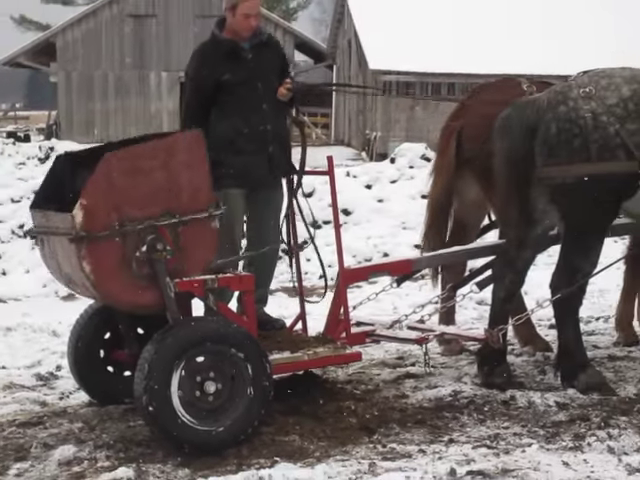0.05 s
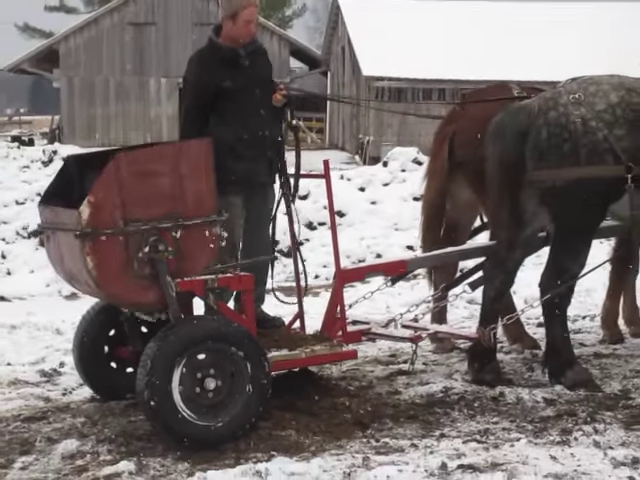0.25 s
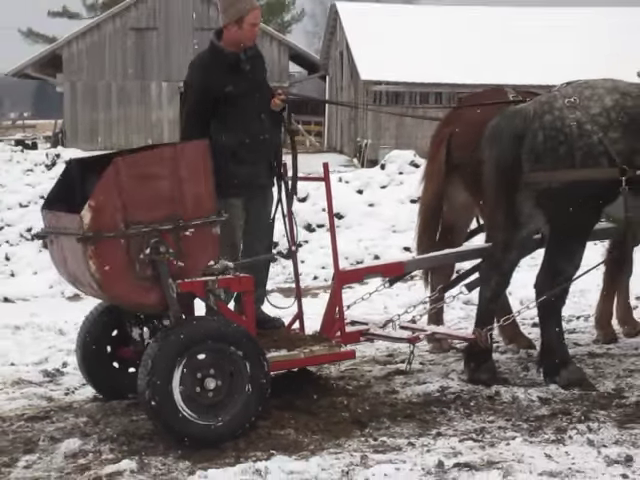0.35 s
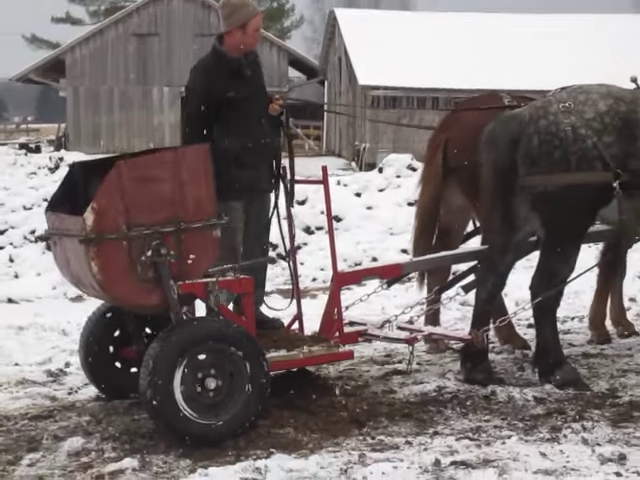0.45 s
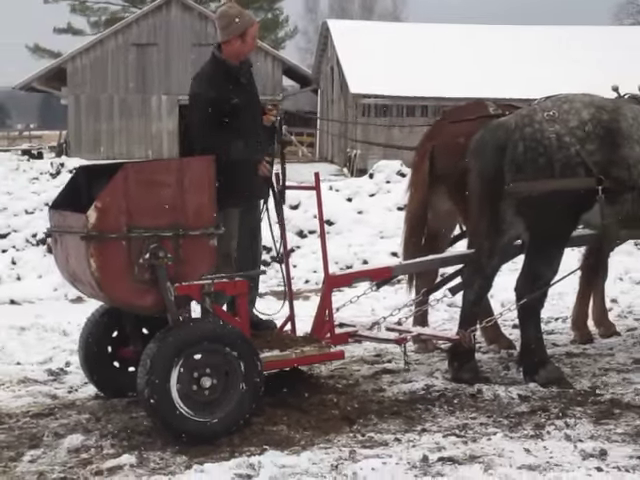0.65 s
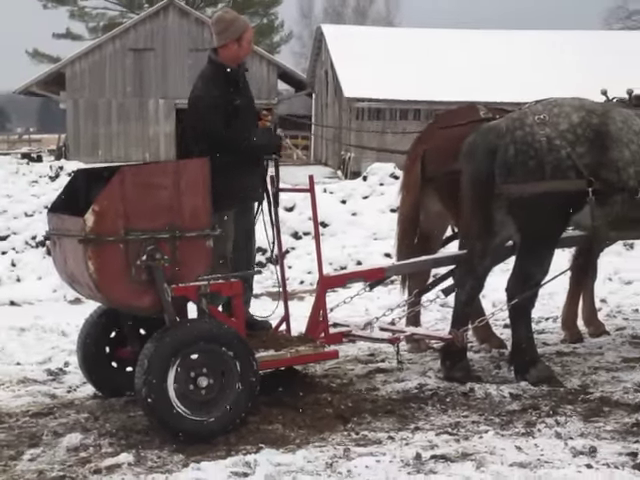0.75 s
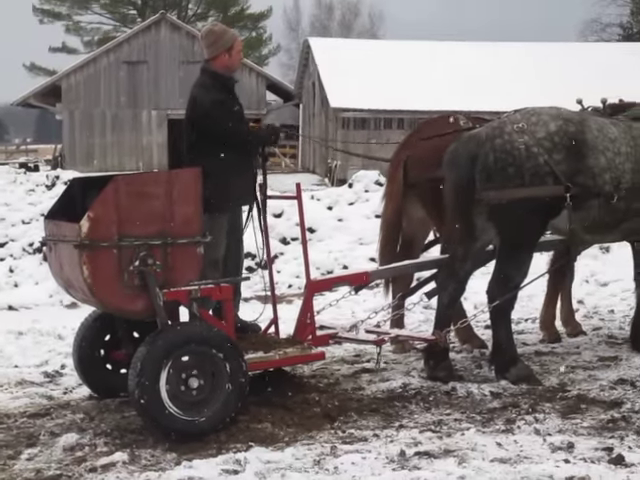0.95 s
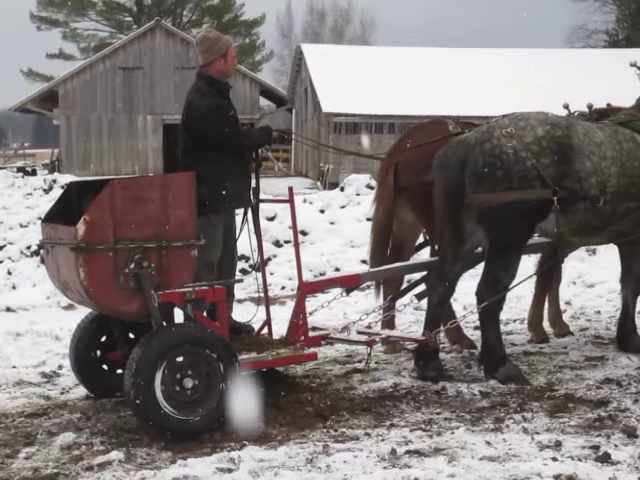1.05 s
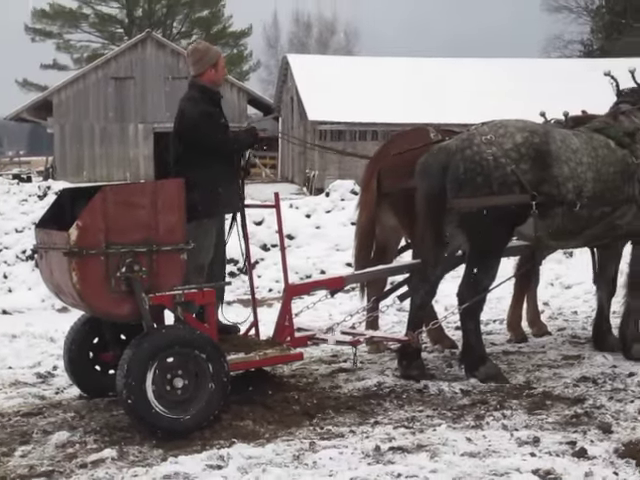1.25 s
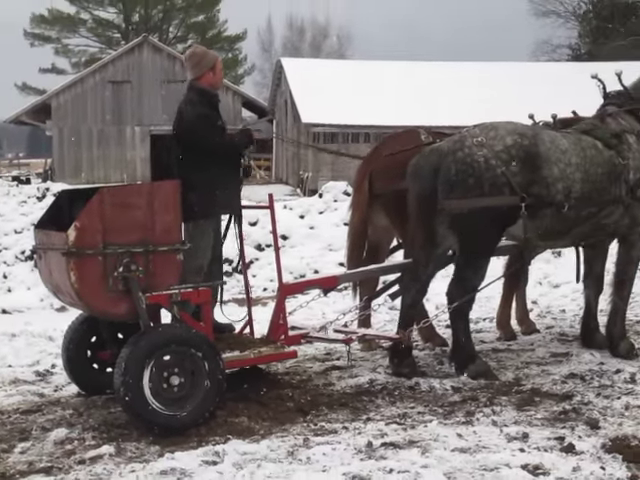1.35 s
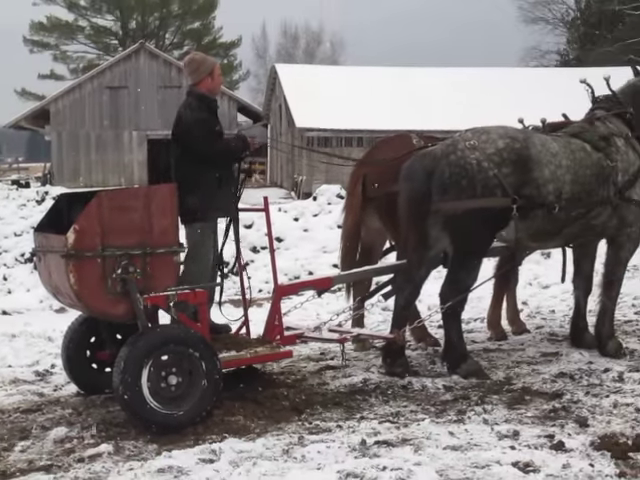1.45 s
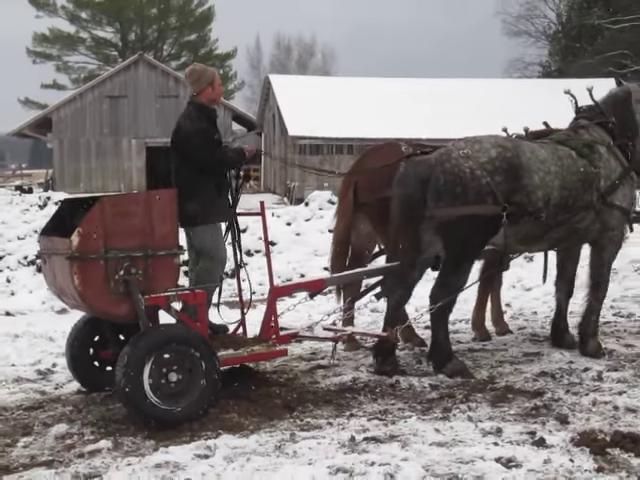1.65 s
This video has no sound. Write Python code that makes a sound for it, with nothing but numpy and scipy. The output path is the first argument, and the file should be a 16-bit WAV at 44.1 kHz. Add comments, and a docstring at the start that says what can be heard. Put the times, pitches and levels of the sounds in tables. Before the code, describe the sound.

Sharp knocks and low clunks from a cart starting to roll, over faint wind.

```python
"""A horse-drawn cart of wood and steel jolts into motion on a farm track, close by.
Impacts in its slack joints excite the damped modes of body, frame and hitch, and the hopper answers with
low clunks. The rolling wheels force hopper, panels and boards into vibration and crush grit; trace chains
clink, and friction makes a joint squeak twice. Faint wind lies behind. An automatic gain control lowers
the level at the loudest knock and recovers slowly."""
import sys
import numpy as np
from scipy import signal
from scipy.fft import rfft, irfft
from scipy.io import wavfile
from scipy.ndimage import uniform_filter1d

SR = 44100
rng = np.random.default_rng(int(sys.argv[2]) if len(sys.argv) > 2 else 0)


def generate_wav(signal):
    """Clip the signal to [-1, 1] and save it as 16-bit WAV at the path in sys.argv[1]."""
    frames = np.transpose(np.atleast_2d(signal))
    scaled = np.clip(frames, -1, 1) * 32767
    pcm = np.round(scaled).astype(np.int16)
    wavfile.write(sys.argv[1], SR, pcm)


N = 74970
T = np.arange(N) / SR

# Impacts in the joints. Each row: start in seconds, levels of wood, steel, hitch and crack in dB,
# chatter time in seconds, spectral tilts of wood and steel in dB per octave.
IMPACTS = [(.2249, 3.5, -1, -13, -3.5, 0.0038, -1.5, 3.5),
           (0.722, -5.5, -5.5, -23, -16.5, 0.0017, -3.5, -1),
           (0.727, -8.5, -12, -24, -17.5, 0.0039, 3.5, -3),
           (.8094, -36.5, -42.5, -52, -34.5, 0.0036, -15, 8), (0.9371, -12, -6.5, -9, -17, 0.0069, -10, -4),
           (1.0534, -22, -17, -22.5, -31, 0.0022, -13.5, 0.5),
           (1.1191, -23, -15.5, -20, -26.5, 0.0061, 9, -3.5),
           (1.195, -26, -28.5, -26, -43.5, 0.0047, -2, -2.5),
           (1.321, -25.5, -25, -27, -40, 0.0015, -1, -5.5), (1.390, -30, -28.5, -31, -51, 0.011, -6.5, -12)]
# Normal modes. Each row: frequency in Hz, relative level in dB, time to decay by 60 dB in seconds.
WOOD_MODES = [(345, -19, .45), (474, -11, .2), (518, -1, .18), (560, -8, .1), (604, -5, .27),
              (646, -14, .3), (714, -7, .18), (813, -20, .22)]
STEEL_MODES = [(1116, -7, 0.3), (1281, 2.5, 0.15), (1362, -26, 0.04), (1636, -6, 0.24), (2005, -19, 0.36),
               (2297, -22, .12), (2446, -1, 0.073), (2713, 3, 0.032), (2998, -7.5, 0.23),
               (3125, -16.5, 0.32), (3114, -4.5, 0.15)]
HITCH_MODES = [(1630, -6, .16), (1722, -6, .14), (1755, 0, .17), (1795, -7, .15), (2255, -10, .14),
               (2445, -7, .15)]
LINK_MODES = [(3760, -9.5, .04), (5200, -9.5, .05), (5950, 5, 0.032), (6970, -1, .07), (6720, -20, 0.028),
              (7240, 0.5, 0.11), (8840, -0.5, .04)]
# Noise spectra. Each row: frequency in Hz, relative spectral density in dB.
WIND_SPECTRUM = [(25, 8), (90, 6), (200, 3), (350, -2), (900, -3.5), (1600, -8.5), (2700, -14.5),
                 (4400, -27.5), (6600, -22), (9000, -37.5), (11500, -40), (15000, -40.5)]
WOOD_SPECTRUM = [(100, -3.5), (170, -5), (300, -20), (430, -9.5), (520, 4), (620, 8.5), (730, 1),
                 (900, -14), (1200, -63.5), (3000, -82.5)]  # overlapping modes of the body
STEEL_SPECTRUM = [(600, -16), (950, 5), (1700, 9), (2050, 3), (2600, 0.5), (3200, -1.5), (3550, -16),
                  (4200, -37.5), (9000, -80.5)]  # overlapping modes of the frame
CRACK_SPECTRUM = [(2500, -35), (3600, 11.5), (4300, -6), (5800, 0.5), (7500, -6), (8600, -18), (10300, -17),
                  (12000, -40.5)]
STRIKE_SPECTRUM = [(200, -16.5), (500, 12.5), (900, -5.5), (1300, 0), (2000, -9), (2700, 17), (3300, 6),
                   (4100, -18.5), (7500, -14.5), (10000, -36), (12000, -42.5), (15500, -44)]  # the first hard contact of a blow
GRIT_SPECTRUM = [(500, 0.5), (900, 4.5), (1800, -5), (3100, -13.5), (4000, -34.5), (7000, -35),
                 (10000, -67)]
# Jolts of the hopper. Each row: start in seconds, frequency in Hz, level in dB.
HOPPER_JOLTS = [(0.225, 110.7, 2), (.365, 115.5, -12), (.724, 110.8, -7.5), (0.813, 92, -10),
                (0.933, 106.3, -10.5), (1.04, 106.9, -14), (1.081, 102.8, -7.5), (1.228, 107.6, -17),
                (1.313, 99, -18)]
# Course of the rolling. Each row: time in seconds, levels of drone, rumble, rattle and grit in dB.
ROLLING_LEVELS = [(0.221, -62, -104, -76, -98), (0.262, -19, -22, -18, -21.5),
                  (0.361, -13.5, -12.5, -20, -41), (.47, -20.5, -16, -29.5, -39),
                  (0.601, -22, -22, -33.5, -36.5), (0.721, -22, -23, -33.5, -36.5),
                  (0.898, -31, -27, -33.5, -45), (1.02, -21.5, -30.5, -28.5, -39),
                  (1.121, -33.5, -32, -20, -36), (1.251, -25, -31, -31.5, -39.5),
                  (1.399, -36, -37, -35, -51.5), (1.5, -38.5, -44, -49, -51.5),
                  (1.571, -29, -53, -49, -54.5), (1.65, -33.5, -48, -57, -57),
                  (1.7, -36.5, -50.5, -52, -63)]
# Resonances driven by rolling. Each row: frequency in Hz, half-width in Hz, relative level in dB.
PANEL_RESONANCES = [(59.5, 18, 0), (86, 42, -9.5), (146, 22, 1.5), (162, 11, -9.5), (210, 8, 1.5),
                    (239, 27, -14), (281, 18, -2.5), (344.5, 7.8, 8), (394, 10, -22), (407, 20, 1)]
BOARD_RESONANCES = [(543, 41, -0.5), (540, 32, -13.5), (608.4, 6, 9), (640.6, 12, -7.5), (657, 17, -4),
                    (778, 26, -7)]
# Contacts in the trace chains. Each row: start in seconds, level in dB.
CHAIN_CONTACTS = [(.338, -47.5), (.346, -48), (.393, -52), (0.422, -53.5), (0.51, -54.5), (.853, -55.5)]
# Rubs of a joint. Each row: start in seconds, duration in seconds, frequency in Hz, level in dB.
JOINT_RUBS = [(1.257, 0.057, 747, -26.5), (1.38, 0.043, 732.5, -25.5), (1.397, 0.082, 813, -33.5),
              (1.423, 0.068, 681, -32)]  # the last three overlap as one squeak
# Stereo balance. Each row: frequency in Hz, right level minus left in dB.
LEVEL_DIFFERENCE = [(100, 0.3), (600, 0.2), (1200, 1), (2800, 1), (5000, 5), (8000, 4)]
# Mismatch of the microphones. Each row: frequency in Hz, left phase minus right in radians.
PHASE_MISMATCH = [(60, -0.33), (300, -0.071), (3000, -0.61)]
# Stereo width. Each row: frequency in Hz, level of the decorrelated part in dB.
DIFFUSE_SHARE = [(100, -42), (600, -39), (2000, -28.5), (8000, -31)]


def amp(db):
    """Amplitude ratio for a level in decibels."""
    return 10 ** (np.asarray(db) / 20)


def curve(points):
    """Interpolation of (Hz, value) points on a logarithmic frequency axis."""
    hz, value = np.array(points).T
    bins_hz = np.maximum(np.fft.rfftfreq(2 * N, 1 / SR), 1)
    return np.interp(np.log(bins_hz), np.log(hz), value)


def colour(x, points, phase=0):
    """Linear filtering by a curve of (Hz, dB) points, with a phase shift in radians."""
    return irfft(rfft(x, 2 * N) * amp(curve(points)) * np.exp(1j * phase))[:N]


def tilt(x, db_per_octave, centre_hz):
    """A constant spectral slope over one octave either side of a centre."""
    return colour(x, [(centre_hz / 2, -db_per_octave), (centre_hz * 2, db_per_octave)])


def noise(spectrum):
    """Gaussian noise with the given spectrum and unit rms."""
    x = colour(rng.standard_normal(N), spectrum)
    return x / np.std(x)


def wander(rate_hz):
    """Smoothed random steps with a spread near 1."""
    hold = int(SR / rate_hz)
    steps = np.repeat(rng.uniform(-1.1, 1, N // hold + 1), hold)
    return 2 * uniform_filter1d(uniform_filter1d(steps, hold), hold)[:N]


def decay(t, t60):
    """Exponential damping by 60 dB in t60 seconds."""
    return np.exp(-np.log(1000) * t / t60)


def wind():
    """Turbulent air gives broadband noise; a second noise in antiphase widens it."""
    return amp(-50.5) * (noise(WIND_SPECTRUM) + amp(-2) * noise(WIND_SPECTRUM) * np.array([[1], [-1]]))


def ring(modes, t, scatter_db=2.5):
    """Free vibration is a sum of damped modes, here varied a little in pitch and level at each blow."""
    out = np.zeros(N)
    for hz, db, t60 in modes:
        detune, strength = rng.standard_normal(2)
        tone = np.sin(2 * np.pi * hz * (1 + .004 * detune) * t)
        out += amp(db + scatter_db * strength) * decay(t, t60) * tone
    return out


def dense_modes(spectrum, t, t60):
    """Modal overlap: close modes merge into noise, with a quick decay and a weaker slow one."""
    return noise(spectrum) * (decay(t, t60) + amp(-9.5) * decay(t, 1.96 * t60))


def knocks(snap_s=.0004):
    """Impact excitation: a blow cracks at once; modes build while the contact chatters, then ring out."""
    out = np.zeros(N)
    for start, wood_db, steel_db, hitch_db, crack_db, chatter_s, wood_tilt, steel_tilt in IMPACTS:
        t = np.maximum(T - start, 0)
        t_free = np.maximum(t - chatter_s, 0)
        snap = 1 - np.exp(-t / snap_s)
        swell = 1 - np.exp(-t / chatter_s)
        wood = amp(-3.5) * ring(WOOD_MODES, t)
        wood += amp(-6.5) * dense_modes(WOOD_SPECTRUM, t_free, t60=.27)
        steel = amp(-12) * swell * ring(STEEL_MODES, t)
        steel += amp(-13.5) * snap * dense_modes(STEEL_SPECTRUM, t_free, t60=.15)
        crack = amp(-22) * noise(CRACK_SPECTRUM) * decay(t_free, t60=.11)
        links = amp(-31.5) * ring(LINK_MODES, t)
        strike = amp(-3) * noise(STRIKE_SPECTRUM) * decay(t, t60=.05)
        hitch = amp(-4) * swell * ring(HITCH_MODES, t)
        out += amp(wood_db) * tilt(swell * wood, wood_tilt, centre_hz=713)
        out += amp(steel_db) * tilt(steel, steel_tilt, centre_hz=1400)
        out += amp(crack_db) * snap * (crack + links + strike)
        out += amp(hitch_db) * hitch
    return out


def hopper_clunks(rise_s=.027):
    """Transient response: the hopper's lowest mode swells and dies after each jolt."""
    out = np.zeros(N)
    for start, hz, db in HOPPER_JOLTS:
        t = np.maximum(T - start, 0)
        age = t / rise_s
        envelope = (age * np.exp(1 - age)) ** 1.6
        out += amp(db) * envelope * np.sin(2 * np.pi * hz * t)
    return out


def shaken(resonances):
    """Resonance: under random forcing a structure responds mainly near its natural frequencies."""
    f = np.maximum(np.fft.rfftfreq(N, 1 / SR), 1)
    gain = sum(amp(db) / (1 + ((f / hz - hz / f) * hz / half_width / 2) ** 2)
               for hz, half_width, db in resonances)
    response = irfft(rfft(rng.standard_normal(N)) * gain, N)
    return response / np.std(response)


def rolling(drone_hz=94.37, drone_flicker_db=1.8, grit_flicker_db=1.9):
    """Forced vibration: the wheels keep the hopper droning, shake panels and boards and crush grit."""
    times, *levels = np.array(ROLLING_LEVELS).T
    drone_gain, rumble_gain, rattle_gain, grit_gain = (amp(np.interp(T, times, db)) for db in levels)
    pitch_hz = drone_hz * (1 + .028 * wander(11))
    hum = np.sqrt(2) * np.sin(2 * np.pi * np.cumsum(pitch_hz) / SR)
    drone = drone_gain * hum * amp(drone_flicker_db * wander(28))
    rumble = rumble_gain * shaken(PANEL_RESONANCES)
    rattle = rattle_gain * shaken(BOARD_RESONANCES)
    grit = grit_gain * noise(GRIT_SPECTRUM) * amp(grit_flicker_db * wander(140))
    return drone + rumble + rattle + grit


def chain_clinks():
    """Light impacts excite the high modes of the links as the traces tighten."""
    out = np.zeros(N)
    tick = noise(CRACK_SPECTRUM)
    for start, db in CHAIN_CONTACTS:
        t = np.maximum(T - start, 0)
        clink = tick * decay(t, t60=.058) + amp(-17.5) * ring(LINK_MODES, t)
        out += amp(db) * (T > start) * clink
    return out


def joint_squeaks():
    """Friction in a rubbing joint sustains short tones of unsteady pitch."""
    out = np.zeros(N)
    for start, duration, hz, db in JOINT_RUBS:
        swell = np.sin(np.pi * np.clip((T - start) / duration, 0, 1))
        pitch_hz = hz * (1 + .02 * wander(180))
        out += amp(db) * swell * np.sin(2 * np.pi * np.cumsum(pitch_hz) / SR)
    return out


def scene():
    """Superposition of cart and wind. A level difference sets the cart slightly right;
    slightly mismatched microphones shift the phase between channels."""
    cart = knocks() + hopper_clunks() + chain_clinks() + rolling() + joint_squeaks()
    scatter = rng.standard_normal(N) * decay(T, t60=.0067)
    scatter /= np.linalg.norm(scatter)
    diffuse = colour(signal.fftconvolve(cart, scatter)[:N], DIFFUSE_SHARE)
    channels = []
    for side in (-1, 1):  # left, right
        balance = [(hz, side * db / 2) for hz, db in LEVEL_DIFFERENCE]
        direct = colour(cart, balance, phase=-side * curve(PHASE_MISMATCH) / 2)
        channels.append(direct + side * diffuse)
    return np.array(channels) + wind()


def record(dry, threshold_db=-9.5, attack_s=.004, release_db_per_s=7.5, low_hz=111, top_hz=15900):
    """Compression and band limiting: gain drops fast and recovers slowly; saturation rounds the peaks."""
    dry = signal.sosfilt(signal.butter(2, low_hz, "high", fs=SR, output="sos"), dry)
    power = uniform_filter1d(np.mean(dry ** 2, axis=0), size=300)
    excess_db = np.maximum(10 * np.log10(np.maximum(power, 1e-12)) - threshold_db, 0)
    reduction_db = np.maximum.accumulate(excess_db + release_db_per_s * T) - release_db_per_s * T
    pole = np.exp(-1 / (attack_s * SR))
    compressed = dry * amp(-signal.lfilter([1 - pole], [1, -pole], reduction_db))
    rounded = compressed / (1 + compressed ** 8) ** (1 / 8)
    return signal.sosfilt(signal.ellip(8, .2, 70, top_hz, fs=SR, output="sos"), rounded)


dry = scene()
out = record(dry)
generate_wav(out)
```